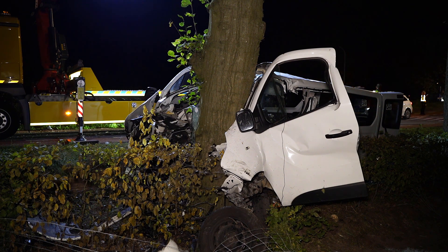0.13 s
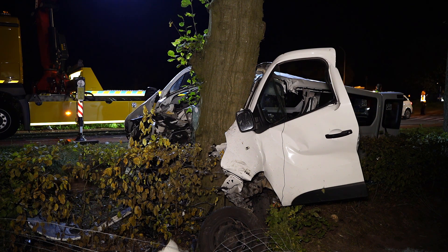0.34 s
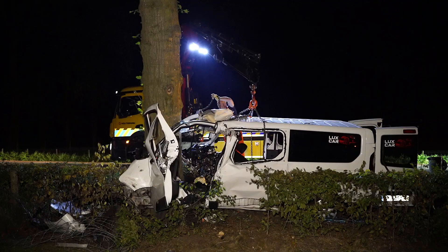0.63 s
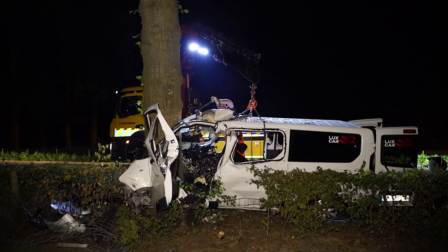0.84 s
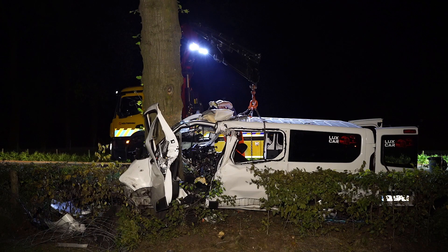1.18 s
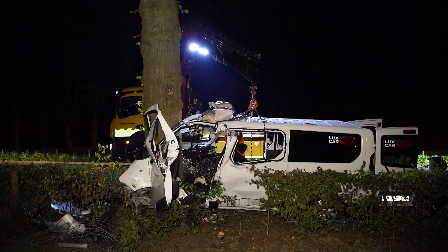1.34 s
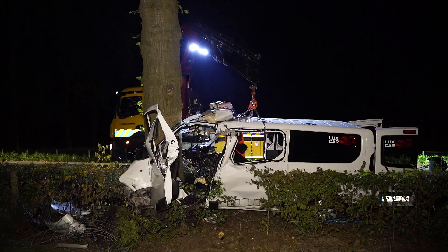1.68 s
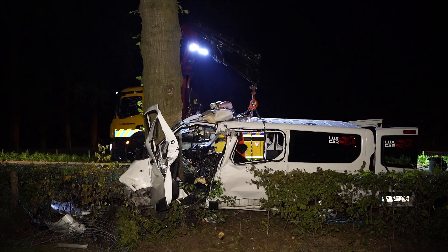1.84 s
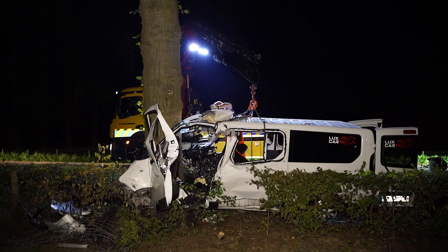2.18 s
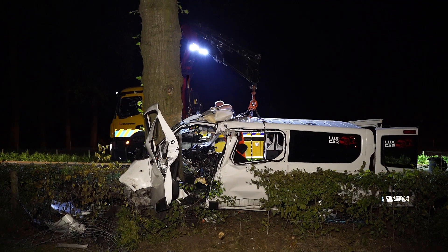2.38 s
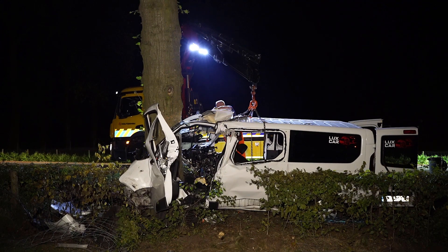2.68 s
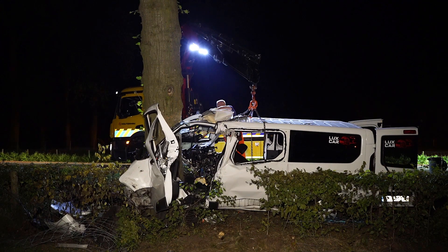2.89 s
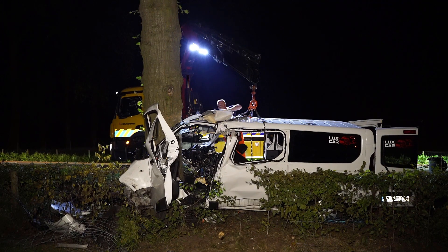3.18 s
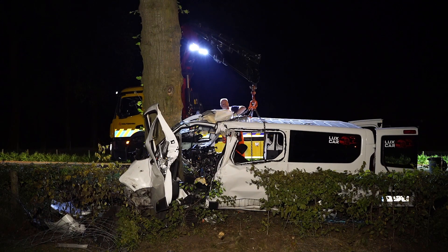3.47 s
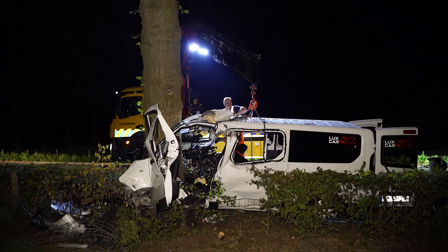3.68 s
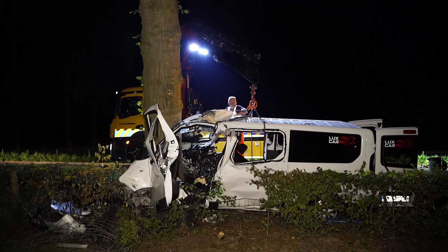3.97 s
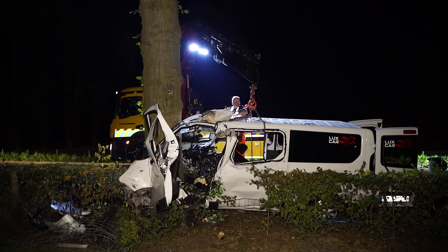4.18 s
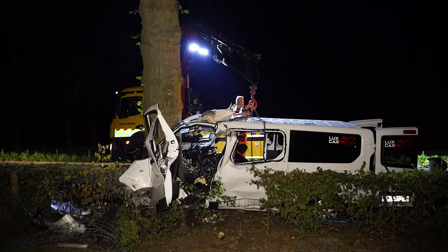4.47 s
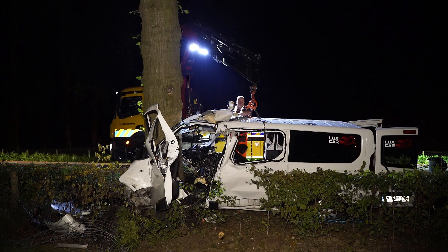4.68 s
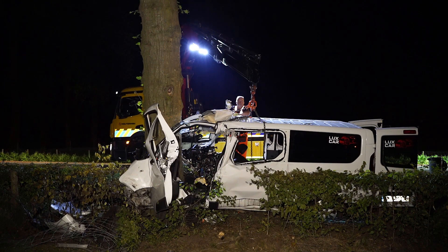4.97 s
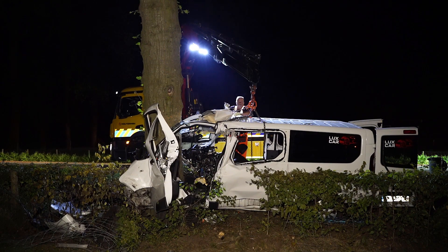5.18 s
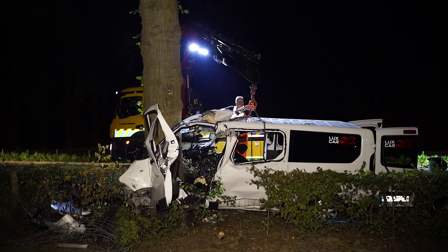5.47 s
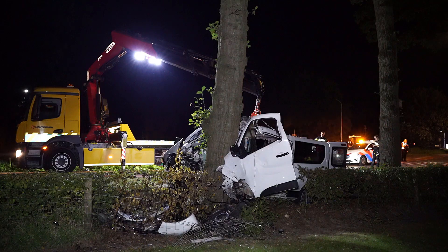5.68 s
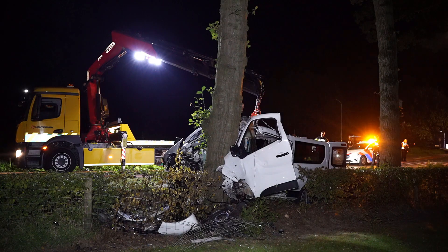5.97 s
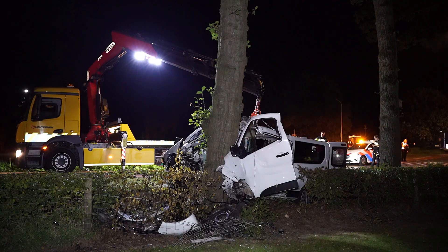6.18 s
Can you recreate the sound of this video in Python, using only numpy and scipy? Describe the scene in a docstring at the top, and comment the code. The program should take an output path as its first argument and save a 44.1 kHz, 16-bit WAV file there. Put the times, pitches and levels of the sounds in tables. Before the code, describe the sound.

Outdoors at night, a recovery truck's diesel idles close by with rough clatter, fan rush and faint gear whine. The view cuts behind a wrecked van: the idle drops back, and chain links tap, knock and scrape on dented sheet metal, densest and loudest around four seconds. Hard clacks on a crane hook follow, with a thin echo from the trees. Last, only the idling truck, from further back.

```python
"""A recovery truck idles close by: bursts of diesel clatter over fan rush, with unsteady gear whine. From
behind a wrecked van, links then knock, scrape and ping on dented sheet metal: noisy contacts ring modes. They
clack against a crane hook once early and again at the end; trees scatter a thin echo and the truck idles on
behind. Finally the truck is heard alone from further back."""
import sys
import numpy as np
from scipy import signal
from scipy.fft import rfft, irfft
from scipy.io import wavfile
from scipy.ndimage import uniform_filter1d

SR = 44100
rng = np.random.default_rng(int(sys.argv[2]) if len(sys.argv) > 2 else 0)


def inscribe(sig):
    """Save sig as 16-bit PCM at rate SR to the path in sys.argv[1].

    A 1-D sig is mono; a 2-D sig holds one channel per row.
    Samples are clipped to [-1, 1] before scaling.
    """
    pcm = np.round(np.clip(np.atleast_2d(sig).T, -1, 1) * 32767)
    wavfile.write(sys.argv[1], SR, pcm.astype(np.int16))


N = 279505
T = np.arange(N) / SR
SIDES = np.array([[1], [-1]])  # left, right

# Tone of the idling truck from three places. Each row: frequency in Hz, level in dB per Hz.
NEAR_TONE = [(30, -40), (100, -33.5), (230, -25), (315, -3.5), (390, -8.5), (510, -1), (620, 0.5),
             (725, -5.5), (940, 1.5), (1170, -6), (1420, -3), (2700, -4.5), (3500, -4.5), (5200, -12.5),
             (6200, -7.5), (6900, -11), (7300, -19.5), (8200, -17), (9500, -20), (10700, -35.5),
             (15000, -46)]
BEHIND_TONE = [(30, -31), (70, -32), (120, -20.5), (200, -18.5), (300, -7), (430, 0), (600, -5), (760, 1.5),
               (1050, -1), (1550, 0), (3400, -2), (5000, -10), (6500, -8), (7300, -14), (9000, -18.5),
               (11000, -40), (15000, -50)]
WIDE_TONE = [(24, -87), (40, -47), (122, -39), (164, -31.5), (554, -6), (710, -6.5), (784, -10), (933, -2),
             (1290, -9), (2780, -8.5), (4030, -14.5), (4340, -13.5), (8690, -23.5), (10900, -50.5),
             (15000, -45)]
# Gear whine. Each row: multiple of the firing rate, level in dB before each place's whine trim.
GEAR_WHINE = [(20, -21.5), (27.5, -30), (40, -23), (60, -17.5), (61, -45), (100, -23.5)]
# Likeness of the truck's two channels. Each row: frequency in Hz, likeness (clipped to 0-1).
TRUCK_LIKENESS = [(350, 1.5), (750, 0.9), (1400, 0.64), (2500, 0), (9000, 0.15)]
# Truck balance. Each row: frequency in Hz, left minus right in dB before each place's lean scales it.
TRUCK_BALANCE = [(150, 0), (350, 1), (750, 3.2), (1400, 2.4), (2500, 3.2), (4000, 5), (6200, -.5),
                 (9000, -3)]
# Fade-in of the view behind the van. Each row: time in seconds, gain in dB.
BEHIND_FADE = [(0.612, -55), (0.625, -27), (0.69, -25), (0.74, -14), (0.79, -6), (0.82, 0)]
# Links falling on the van; the two rows at about 1.2 s are a link striking the hook. Each row: time of the
# attack in seconds, middle level in dB, thud as bass in dB re the middle, hardness as treble in dB re the
# middle, scraping in as rise time in seconds, chatter as decay time in seconds, pitch of the struck spot in Hz,
# ring of that spot in dB.
LINK_KNOCKS = [(0.6249, -49, -2, -15, .004, .025, 545, 13), (0.6922, -48, -18, -7, 0.0013, 0.0061, 2430, 0),
               (0.7301, -55.5, -20, -1, 0.00054, 0.0045, 1670, 0),
               (0.75, -59, 2.5, -37, .006, 0.055, 455, 12), (0.8002, -52.5, -8, -24, .0005, 0.0054, 820, 2),
               (0.817, -48, -9.5, -20, .0013, 0.011, 473, 18), (0.833, -55, -3, -31, 0.0023, 0.026, 780, 8),
               (0.875, -58, -1, -23, 0.0032, 0.028, 480, 16), (0.912, -59, 1, -12, .002, 0.028, 600, 8),
               (0.952, -56, -7, -13, 0.0011, .012, 480, 3), (1.012, -52.5, -5, -20, 0.0036, .025, 800, -5),
               (1.0569, -48, -8.5, -7.5, .0012, 0.011, 958, -1),
               (1.0959, -55.5, -3, -8, 0.0015, 0.012, 990, 2),
               (1.1965, -43.5, -18, -6, .0006, 0.007, 3520, 11),
               (1.2025, -44, -5, -6.5, 0.0011, 0.0049, 1145, 16),
               (1.4415, -52.5, -14, -6.5, 0.0016, .002, 1570, 4),
               (2.4154, -46, -14, -11, .0016, 0.012, 1496, 2),
               (2.4511, -44.5, -22, -9.5, .002, 0.0081, 1650, 5), (2.4752, -57, -2, -2, .0011, 0.03, 850, 4),
               (2.5267, -51.5, 1, -5, .0012, 0.021, 347, 4), (2.5537, -46, -5, 1.5, .001, .012, 338, 5),
               (2.5599, -41.5, -22, -11, 0.0016, 0.0089, 1400, 7),
               (2.5852, -54.5, 3.5, -15, .0012, .015, 970, 8), (2.678, -60.5, 5, 2, 0.0045, .012, 350, 2),
               (2.7938, -53, -3.5, -1, .0019, 0.049, 1420, 9), (2.8848, -42, -6, -5, .0005, 0.013, 877, -4),
               (2.8956, -36, -7.5, -9.5, .0015, 0.011, 1230, -3), (2.9125, -46, -1, -1, 0.002, 0.01, 344, 4),
               (2.9982, -50, -2, -4.5, 0.0011, 0.075, 1000, 0),
               (3.0367, -54.5, -12, 2.5, .0016, 0.043, 1030, 0),
               (3.0755, -45, -11, -6, .0006, 0.013, 2130, -2),
               (3.1175, -45.5, -2, -8, .0008, 0.0061, 565, 7),
               (3.1271, -43.5, -2, -7.5, 0.0011, 0.015, 2760, -7),
               (3.2531, -54, -5, -14, 0.0023, 0.01, 527, 9), (3.4022, -54, -5.5, -7, .0013, .011, 860, 0),
               (3.644, -47, -12, -8, 0.0077, 0.012, 1680, 4), (3.706, -46, -2, -10, 0.013, 0.015, 398, 3),
               (3.7534, -49.5, 0, 2.5, 0.011, 0.023, 970, 4), (3.7648, -39, -9, -4, 0.003, .011, 1475, 12),
               (3.7841, -47, -5, -3, .0014, 0.017, 1730, 10), (3.8139, -44, 3, -4.5, 0.0017, 0.0088, 980, 4),
               (3.8257, -43.5, -6, -6, 0.0046, 0.011, 931, 2), (3.838, -38, -8, -7, 0.0013, 0.012, 1728, 14),
               (3.8744, -35.5, -8, -9.5, .0009, 0.013, 1243, 4),
               (3.8907, -44.5, 4.5, -3, .0009, 0.0046, 348, 6),
               (3.912, -44.5, -5, -3, .0017, 0.012, 1711, 12),
               (3.9513, -44, -1.5, -.5, 0.0023, 0.021, 2450, 1),
               (4.0113, -32.5, -7, -2.5, 0.0013, 0.021, 1819, -5), (4.0224, -32, -2, -8, .001, 0.01, 980, 4),
               (4.06, -42, -15, -14, .003, 0.0066, 1130, 13),
               (4.0755, -33.5, -12, -1.5, 0.0009, 0.01, 3203, 2),
               (4.092, -37, -1, -4, 0.0041, 0.008, 760, 4), (4.1, -37, -5, -6, 0.0017, 0.0048, 3220, 12),
               (4.1535, -30.5, -8, -8.5, 0.00082, .011, 845, -2),
               (4.1959, -43, -17, -1.5, .0012, 0.0094, 855, 3),
               (4.2652, -42, -4, -3, 0.00059, 0.0043, 2147, 5),
               (4.279, -47.5, -2, -3.5, .001, .01, 3250, -3), (4.371, -50, -4, -12, 0.0011, 0.013, 1180, 3),
               (4.6462, -39, -2.5, -14, .0005, 0.012, 1260, 0), (4.664, -49.5, 1, -27, .002, 0.022, 890, 8),
               (4.743, -39.5, 0, -17, 0.00032, 0.011, 495, 6.5),
               (4.7626, -47.5, 2.5, -4, .001, 0.01, 1310, 6), (4.783, -51.5, 2, -16, .002, 0.006, 920, 6),
               (4.8229, -45.5, 0, -13, 0.00063, 0.0095, 1290, 6),
               (4.8427, -50, -4, -19, .0012, 0.0093, 875, 6), (4.872, -60, 8, -28, 0.0027, 0.022, 1290, 9),
               (4.895, -63, 3, -20, .003, .008, 820, 2)]
# Links striking the hook. Each row: time of the attack in seconds, middle level in dB,
# thud in dB re the middle, hardness in dB re the middle, scraping in as rise time in seconds,
# chatter as decay time in seconds, pitch of the struck spot in Hz, ring of that spot in dB.
HOOK_CLACKS = [(5.2171, -54.5, -10, 0, 0.00072, .0033, 1930, 1),
               (5.27, -59.5, -13, 2.5, .0008, .004, 1932, 2),
               (5.3075, -53.5, -10, 1.5, 0.0013, 0.0067, 1749, 6),
               (5.3177, -46.5, -13, -1, 0.0028, 0.0095, 1900, 7),
               (5.3316, -47.5, -6.5, -1.5, .001, 0.013, 4100, -5),
               (5.3615, -51, -0.5, -2, .001, 0.0063, 400, 10), (5.4125, -47.5, -7, 1, 0.0007, .012, 769, 4),
               (5.4348, -46.5, -5, 4, 0.0066, 0.016, 3585, 0),
               (5.4515, -44, -4.5, -0.5, 0.0013, 0.0073, 3569, -3),
               (5.4615, -48, -8, -3, 0.0011, 0.0043, 2230, -9),
               (5.5178, -40.5, -7, 3.5, 0.0036, 0.0056, 1126, 15),
               (5.5298, -37, -9, 0, 0.00072, 0.0091, 1540, 8),
               (5.5385, -39.5, -15, -4.5, .001, 0.0088, 2060, 3),
               (5.5867, -34, -10, -1, 0.0034, 0.0085, 1640, -14),
               (5.5979, -38, -20, -5.5, 0.0014, 0.0057, 1920, 6)]
# Modes of the dented panel. Each row: frequency in Hz, relative level in dB, t60 in seconds.
PANEL_MODES = [(338, 1, .11), (378, 3, .11), (538, 2, .12), (610, 0, .1), (737, 3, .17), (795, -5, .1),
               (892, -2, .1), (963, 2, .1), (1050, 0, .1), (1244, 0, .15), (1507, -1, .12), (1610, 1, .19),
               (1728, 0, .11), (1798, 0, .12), (2061, 0, .14), (2234, -2, .15), (2429, 3, .16),
               (2713, -1, .1), (3260, 3, .04), (4151, 0, .08), (5297, 2, .08), (6837, 4, .05)]
# Modes of the hook. Each row: frequency in Hz, relative level in dB, t60 in seconds.
HOOK_MODES = [(1114, 9, .065), (1523, 5, .05), (1605, 6, .06), (1887, 5, .05), (2094, 4, .05),
              (3198, 1, .04), (3470, 8, .035), (3605, 8, .035), (3835, 9, .035), (6085, 5, .035),
              (6379, 7, .03), (7294, 6, .03)]
# Tone of contacts on the panel and on the hook. Each row: frequency in Hz, level in dB.
PANEL_COLOUR = [(30, -50), (110, -21), (190, -14.5), (250, -7), (325, 3.5), (390, 4), (440, 3), (490, 5.5),
                (550, 1), (900, 6.5), (1750, 3.5), (2150, 0.5), (3500, -4), (5000, -8.5), (7500, -13),
                (10000, -28), (13000, -36), (15000, -37)]
HOOK_COLOUR = [(30, -34), (180, -38), (330, -1), (450, 3.5), (800, 1), (1800, 8), (3700, 7.5), (4500, -0.5),
               (7800, -1), (9300, -17), (13000, -21), (15000, -21)]
# Likeness of the chain's two channels. Each row: frequency in Hz, likeness from 0 to 1.
CHAIN_LIKENESS = [(300, .999), (750, .99), (1400, .97), (2500, .82), (4000, .87), (9000, .6)]
# Balance of the chain and its echo. Each row: frequency in Hz, left minus right in dB.
CHAIN_BALANCE = [(300, 0), (1400, -.3), (2500, 1), (3800, 2.8), (6200, -.7), (9000, -4)]
# Likeness of the echo's two channels. Each row: frequency in Hz, likeness from 0 to 1.
ECHO_LIKENESS = [(300, .995), (750, .92), (1400, .75), (2500, .2), (9000, .05)]
# Tone of the echo. Each row: frequency in Hz, level in dB.
ECHO_COLOUR = [(300, -2.0), (1000, 0.5), (2500, 4.0), (3600, 4.5), (7000, 8.5), (8500, 9.0), (12000, 11.0)]
# Pings of a free link. Each row: start in seconds, lower mode in dB, upper mode in dB re the lower.
LINK_PINGS = [(0.802, -58, 0), (0.862, -63, 0), (0.911, -63, 0), (1.092, -63, 1), (4.158, -43, -8),
              (4.196, -58, 13)]
# The pair of modes of a free link. Each row: frequency in Hz, relative level in dB, t60 in seconds.
FREE_LINK_MODES = [(8118, -2, .5), (8437, 0, .46)]
# Pulls that drag the chain. Each row: start in seconds, length in seconds, level in dB.
CHAIN_PULLS = [(1.2, 0.025, -66), (2.513, 0.23, -57), (3.02, 0.079, -53), (3.74, 0.41, -50),
               (4.647, 0.045, -53.5), (4.755, 0.12, -56), (5.36, 0.035, -50.5), (5.538, 0.08, -50)]

FIRING_HZ = 35.2
NEAR_DB, BEHIND_DB, WIDE_DB = -45.5, -53.5, -48.5
FIRST_CUT_S, SECOND_CUT_S = 0.533, 5.617
# ring strength of panel and hook, re the contacts (dB)
PANEL_RING_DB, HOOK_RING_DB = -54.5, -44.5
BOOM_T60_S = 0.22
# pinched links: range of pitch and ring time
CLINK_LOW_HZ, CLINK_HIGH_HZ, CLINK_T60_S = 1400, 7800, 0.03
# how unevenly the tiny contacts of a blow land
GRAIN_DB = 2.5
# extra treble at the first touch of a blow, and how fast it softens
CRACK_DB, CRACK_S = -5, 0.003
# pulls build and die at steady rates; between them the chain barely creeps
PULL_ATTACK_DB_PER_S, PULL_RELEASE_DB_PER_S, CREEP_DB = 268, 180, -77
TOP_HZ = 15850


def undb(db):
    """Turn decibels into gain."""
    return 10 ** (np.asarray(db) / 20)


def rms(x):
    """Root mean square, kept above zero."""
    return np.sqrt(np.mean(x ** 2)) + 1e-18


def over_hz(points, size):
    """Read a frequency table at the bins of a transform, on a log scale."""
    hz, value = np.transpose(points)
    bins_hz = np.fft.rfftfreq(size, 1 / SR)
    return np.interp(np.log(bins_hz + 1), np.log(hz), value)


def colour(x, points):
    """Shape the tone with a minimum-phase filter, so nothing sounds before its cause."""
    size = x.shape[-1]
    cepstrum = irfft(np.log(undb(over_hz(points, size))), size)
    # folding the cepstrum forward makes the filter causal
    cepstrum[1:size // 2] *= 2
    cepstrum[size // 2:] = 0
    return irfft(rfft(x) * np.exp(rfft(cepstrum)), size)


def stereo(pair, likeness, balance, lean=1):
    """Blend two unrelated signals into left and right, with likeness and balance set by frequency."""
    size = pair.shape[-1]
    alike = np.clip(over_hz(likeness, size), 0, 1)
    mid, side = rfft(pair)
    both = np.sqrt((1 + alike) / 2) * mid + SIDES * np.sqrt((1 - alike) / 2) * side
    side_gain = undb(SIDES * lean * over_hz(balance, size) / 2)
    return irfft(both * side_gain, size)


def filtered(x, hz, kind="low", order=4):
    """Butterworth low- or high-pass."""
    return signal.sosfilt(signal.butter(order, hz, kind, fs=SR, output="sos"), x)


def resonance(x, hz, q):
    """Pass the sound through one resonance."""
    return signal.lfilter(*signal.iirpeak(hz, q, fs=SR), x)


def bands(x):
    """Split into bass, middle and treble at 700 and 2800 Hz."""
    bass = filtered(x, 700)
    middle = filtered(filtered(x, 2800), 700, "high")
    treble = filtered(x, 2800, "high")
    return bass, middle, treble


def fall(t, t60):
    """Exponential decay by 60 dB in t60 seconds."""
    return np.exp(-np.log(1000) * t / t60)


def ring(modes, t, scatter_db=3, detune=0.0042):
    """Sum decaying modes, with levels and pitches scattered anew at each call."""
    hz, db, t60 = np.transpose(modes)[:, :, None]
    weight, shift = rng.standard_normal((2, len(modes), 1))
    level = undb(db + scatter_db * weight)
    tone = np.cos(2 * np.pi * hz * (1 + detune * shift) * t)
    return np.sum(level * fall(t, t60) * tone, axis=0)


def ringing(x, modes, t):
    """Excite a set of modes with a stereo signal."""
    return signal.fftconvolve(x, ring(modes, t)[None], axes=1)[:, :x.shape[-1]]


def walk(rate):
    """Smooth random wander from new values at the given rate in Hz."""
    step = int(SR / rate)
    held = np.repeat(rng.standard_normal(N // step + 1), step)
    smooth = uniform_filter1d(uniform_filter1d(held, step), step)
    return smooth[:N] * np.sqrt(2)


def add(out, s, x):
    """Mix a sound in at a time in seconds."""
    start = int(s * SR)
    out[:, start:start + x.shape[-1]] += x[..., :N - start]


def truck(tone, db, lean, whine_db, clatter):
    """Diesel idle: a burst of clatter at each firing over fan rush, with gears whining unsteadily in step."""
    turns = np.cumsum(FIRING_HZ * (1 + 0.00153 * walk(7.3))) / SR
    bursts = 1 + clatter * np.exp(-(turns % 1) / 0.32)
    firing = bursts * undb(0.5 * walk(6.1))
    noise = rng.standard_normal((2, N)) * firing
    rush = stereo(colour(noise, tone), TRUCK_LIKENESS, TRUCK_BALANCE, lean)
    gears = 0
    for multiple, line_db in GEAR_WHINE:
        phase = 2 * np.pi * (multiple * turns + rng.random()) + 0.7 * walk(45)
        unsteady_db = line_db + 1.6 * walk(30) + 0.6 * walk(4)
        gears = gears + np.sqrt(2) * undb(unsteady_db) * np.sin(phase)
    rush = rush / rms(rush.mean(axis=0))
    return undb(db) * (rush + undb(whine_db + SIDES * lean) * gears)


def link_modes(count=6):
    """A link pinched between its neighbours rings briefly, at other pitches each time."""
    return [(hz, 0, CLINK_T60_S) for hz in rng.uniform(CLINK_LOW_HZ, CLINK_HIGH_HZ, count)]


def blows(events, modes, tone, ring_db, spot_q, boom_db, boom_t60, boom_hz, clink_db, size=8192):
    """A swelling, then dying chatter of tiny contacts rings the struck metal and the links, over a low boom."""
    out, t = np.zeros((2, N)), np.arange(size) / SR
    lead = SR // 50  # samples of scraping in before the attack
    since = t - lead / SR
    after = np.maximum(since, 0)
    for s, blow_db, bass_db, treble_db, lead_in_s, chatter_s, spot_hz, spot_db in events:
        unevenness = np.repeat(rng.standard_normal(size // 16), 16)
        contacts = rng.standard_normal((2, size)) * undb(GRAIN_DB * unevenness)
        swell = np.exp(np.minimum(since, 0) / lead_in_s)
        contacts *= swell * np.exp(-after / chatter_s) / rms(contacts)
        # countless low modes boom with their own decay, the more so after a dull blow
        boom = filtered(rng.standard_normal((2, size)), boom_hz, order=2) * swell * fall(after, boom_t60)
        struck = contacts + undb(boom_db - 0.47 * treble_db) * boom
        struck = struck + undb(ring_db) * ringing(contacts, modes, t)
        struck = struck + undb(clink_db) * ringing(contacts, link_modes(), t)
        # every spot has a short, broad resonance of its own
        struck = struck + undb(spot_db) * resonance(struck, spot_hz, spot_q)
        sound = stereo(colour(struck, tone), CHAIN_LIKENESS, CHAIN_BALANCE)
        bass, middle, treble = bands(sound)
        # the first touch is the hardest
        treble = treble * (1 + undb(CRACK_DB) * swell * np.exp(-after / CRACK_S))
        for part, db in ((bass, bass_db), (middle, 0), (treble, treble_db)):
            # force and hardness set each band's level over the 20 ms after the attack
            attack = rms(part.mean(axis=0)[lead:2 * lead])
            add(out, s - lead / SR, part * undb(blow_db + db) / attack)
    return out


def trees(x, echo_db=-11, t60=0.79, build_s=0.013):
    """Trunks, hedge and truck scatter a thin, diffuse echo that builds quickly and decays."""
    t = T[:SR]
    scatter = rng.standard_normal((2, SR)) * fall(t, t60) * (1 - np.exp(-t / build_s))
    scatter = stereo(scatter, ECHO_LIKENESS, CHAIN_BALANCE)
    scatter = colour(scatter / rms(scatter) / np.sqrt(SR), ECHO_COLOUR)
    return undb(echo_db) * signal.fftconvolve(x.mean(axis=0)[None], scatter, axes=1)[:, :N]


def pings(pan_db=-4):
    """A link hanging free rings with a close pair of high modes, louder and one sample earlier on the right."""
    out = np.zeros((2, N))
    for s, db, upper_db in LINK_PINGS:
        for mode, mode_db in zip(FREE_LINK_MODES, (db, db + upper_db)):
            tone = ring([mode], T[:SR], scatter_db=1, detune=0.0003)
            add(out, s, undb(mode_db + SIDES * pan_db / 2) * tone)
    return np.array([np.roll(out[0], 1), out[1]])


def pulling():
    """How hard the chain is dragged: every pull has an attack, a hold and a release."""
    level_db = np.full(N, float(CREEP_DB))
    for s, length_s, db in CHAIN_PULLS:
        early = np.maximum(s - T, 0)
        late = np.maximum(T - s - length_s, 0)
        pull_db = db - PULL_ATTACK_DB_PER_S * early - PULL_RELEASE_DB_PER_S * late
        level_db = np.maximum(level_db, pull_db)
    return undb(level_db)


def sliding(grain_db=7, jerk_db=5, drone_db=4, drone_hz=345, drone_q=4, ring_db=-55):
    """Links scrape over the sheet in uneven jerks, ring its modes and set its lowest resonance droning."""
    roughness_db = grain_db * np.tanh(walk(900)) + jerk_db * np.tanh(walk(70))
    grains = rng.standard_normal((2, N)) * undb(roughness_db)
    grains = grains + undb(ring_db) * ringing(grains, PANEL_MODES, T[:SR // 4])
    grains = grains + undb(drone_db) * resonance(grains, drone_hz, drone_q)
    scrape = stereo(colour(grains, PANEL_COLOUR), CHAIN_LIKENESS, CHAIN_BALANCE)
    return scrape / rms(scrape) * pulling()


def scene():
    """The truck from close by, the rigging from behind the van, then the truck from further back."""
    near = truck(NEAR_TONE, NEAR_DB, lean=1.83, whine_db=-8, clatter=0.48)
    chain = blows(LINK_KNOCKS, PANEL_MODES, PANEL_COLOUR, ring_db=PANEL_RING_DB, spot_q=8.3,
                  boom_db=-12.5, boom_t60=BOOM_T60_S, boom_hz=1500, clink_db=-43.5)
    chain += blows(HOOK_CLACKS, HOOK_MODES, HOOK_COLOUR, ring_db=HOOK_RING_DB, spot_q=16,
                   boom_db=-6.5, boom_t60=BOOM_T60_S, boom_hz=1430, clink_db=-59)
    chain += sliding()
    behind = truck(BEHIND_TONE, BEHIND_DB, lean=1.0, whine_db=6.5, clatter=0.22)
    rigging = chain + trees(chain) + pings() + behind
    fade = undb(np.interp(T, *np.transpose(BEHIND_FADE)))
    wide = truck(WIDE_TONE, WIDE_DB, lean=1.56, whine_db=1.5, clatter=0.17)
    return np.where(T < FIRST_CUT_S, near, np.where(T < SECOND_CUT_S, rigging * fade, wide))


def record(dry):
    """A steep elliptic low-pass cuts the top."""
    return signal.sosfilt(signal.ellip(10, 0.2, 70, TOP_HZ, fs=SR, output="sos"), dry)


dry = scene()
out = record(dry)
inscribe(out)
```